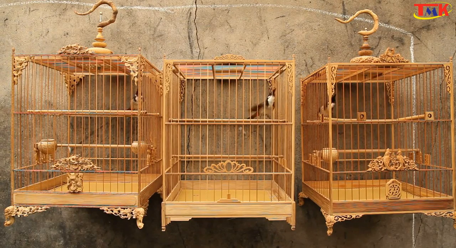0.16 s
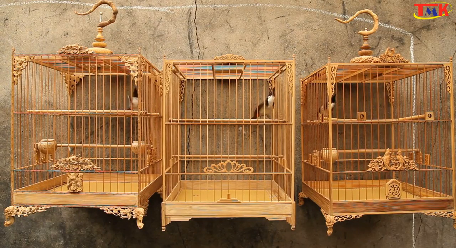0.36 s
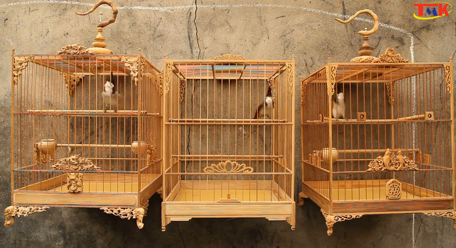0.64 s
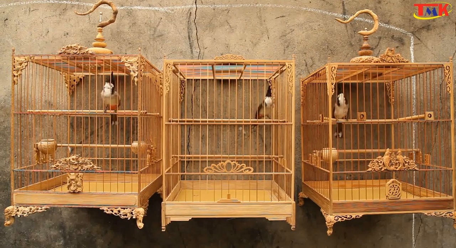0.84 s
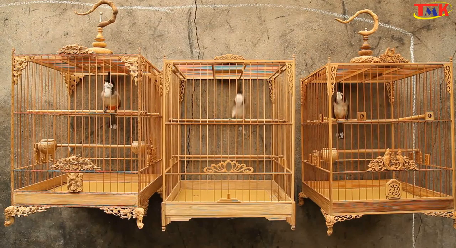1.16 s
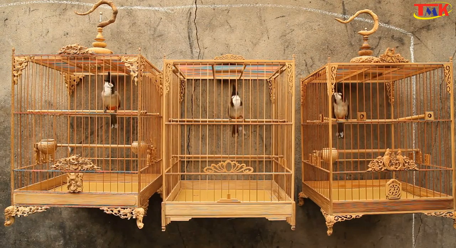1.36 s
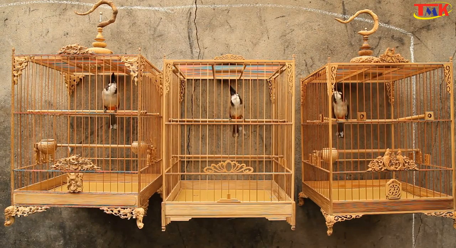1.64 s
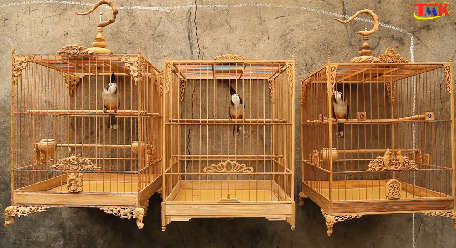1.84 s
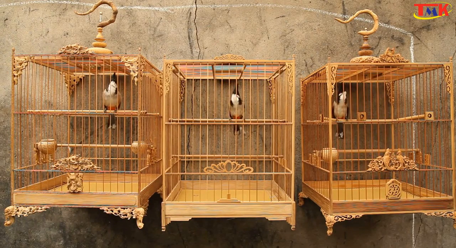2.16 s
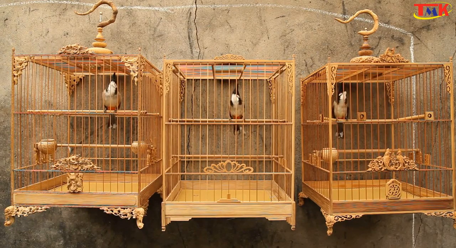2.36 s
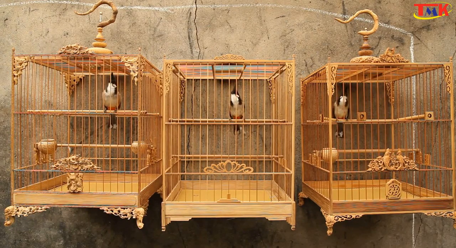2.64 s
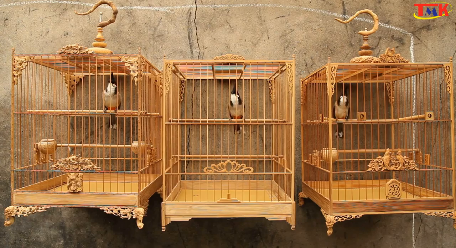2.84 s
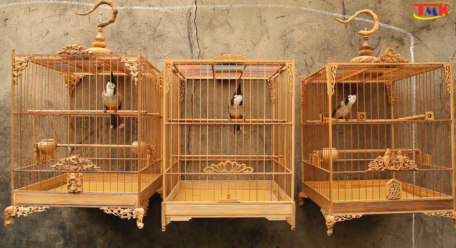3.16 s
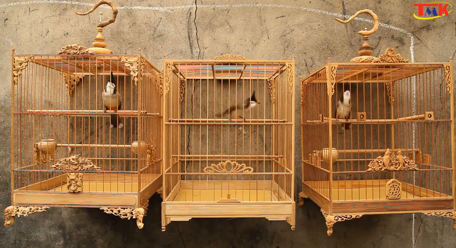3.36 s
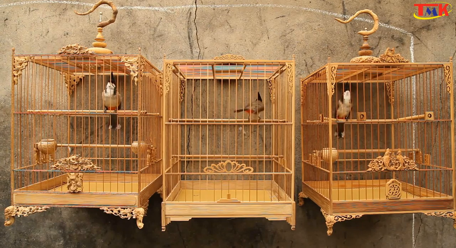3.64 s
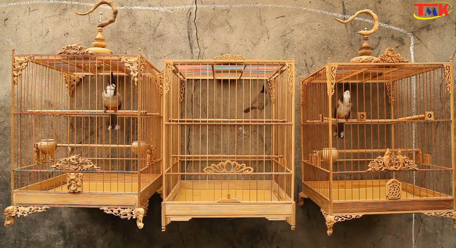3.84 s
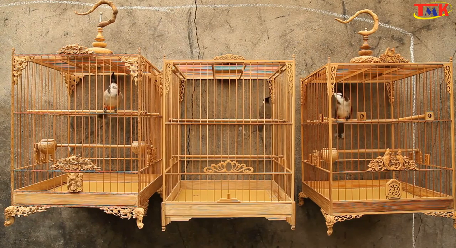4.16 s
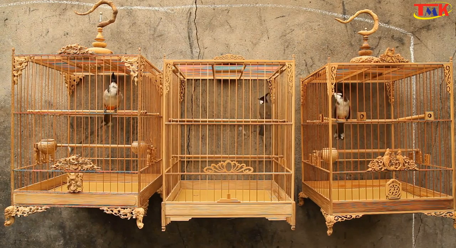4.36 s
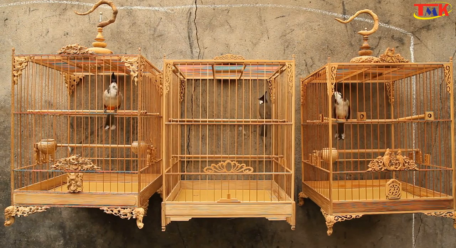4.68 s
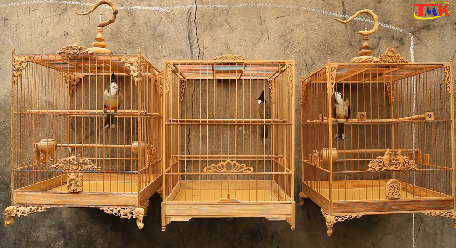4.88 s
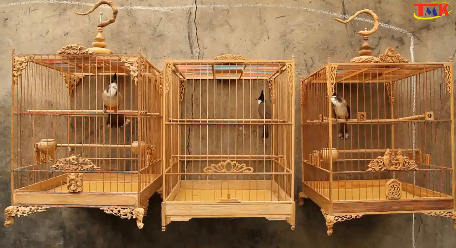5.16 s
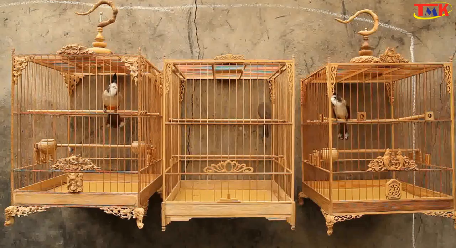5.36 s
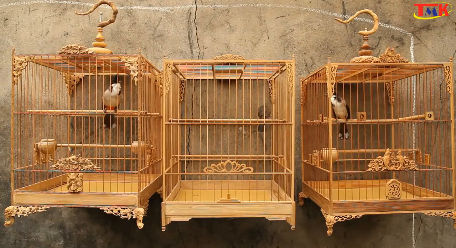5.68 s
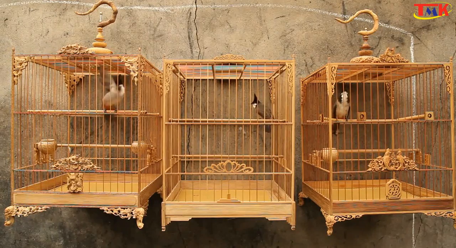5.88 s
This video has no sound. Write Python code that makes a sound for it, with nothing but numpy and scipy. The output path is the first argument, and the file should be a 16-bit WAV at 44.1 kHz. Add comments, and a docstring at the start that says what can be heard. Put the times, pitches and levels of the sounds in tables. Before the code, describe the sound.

Small birds sing short phrases of buzzy chirps and clear whistles with pauses between, over soft hiss and a faint low hum.

```python
"""A hard-walled room: caged bulbuls trade whistles, buzzy chirps and low chuckles in short phrases.
Each call is a syrinx tone with weak overtones; higher notes tend to be louder, purer, more deeply trilled.
Other birds answer from further off and one rustles its feathers, over rumble, hiss and a faint on-off hum.
A gain control ducks at loud chirps and creeps back up in the pauses."""
import sys
import numpy as np
from scipy import signal
from scipy.fft import rfft, irfft, next_fast_len
from scipy.io import wavfile
from scipy.ndimage import uniform_filter1d, map_coordinates

SR = 44100
rng = np.random.default_rng(int(sys.argv[2]) if len(sys.argv) > 2 else 0)


def store_wav(level_fs):
    """Save 16-bit WAV to argv[1]."""
    pcm = np.round(np.clip(np.atleast_2d(level_fs), -1, 1) * 32767)
    wavfile.write(sys.argv[1], SR, pcm.T.astype(np.int16))


N = 265041
TOP_HZ = 15800
ATTACK_S, RELEASE_S = 0.01, 0.0045

# rumble and hiss spectrum: f/Hz, relative density/dB
AIR_SPECTRUM = [(20, -5), (34, -10.5), (65, -12), (100, -7), (130, 0.5), (180, -5.5), (290, -8.5),
                (450, -10.5), (800, -15.5), (2000, -14.5), (4500, -22.5), (7500, -25), (9500, -38),
                (15500, -52)]
# hum swells: t/s, length/s, f/Hz, level/dB
HUM_SWELLS = [(0, 0.11, 147, -38.5), (.33, 0.2, 151, -42), (1.95, 0.65, 128, -52.5), (2.7, 0.2, 142.7, -42),
              (4.25, 1.27, 155.9, -42)]
# throat colour of the overtones: f/Hz, gain/dB
THROAT_GAIN = [(2500, 21), (3300, 4), (4300, -9.5), (5300, -9.5), (6500, -7.5), (8000, -14), (9300, -18.5),
               (10800, -8.5), (12500, -21), (15500, -28)]
# fundamental, weaker at the top of the chirp range: f/Hz, gain/dB
FUNDAMENTAL_GAIN = [(3500, -0.5), (3900, -3), (4400, 1.5)]
# loudness by pitch: f/Hz, gain/dB
EFFORT_GAIN = [(1350, -17.5), (1700, -5.5), (2050, -1.5), (2500, 2), (3100, 4.5), (3700, 6.5)]
# overtones by pitch, ahead of the throat: f/Hz, gain/dB
OVERTONE_GAIN = [(1600, -20), (2100, -22), (2500, -28), (3600, -28.5)]
# full trill by pitch: f/Hz, depth/Hz
TRILL_DEPTH = [(1600, 89), (2400, 162), (3000, 218), (3700, 197)]
# far pips: t/s, length/s, mid f/Hz, accent/dB
FAR_PIPS = [(0, 0.034, 1586, -21.5), (0.137, 0.074, 1649, -17.5), (0.217, 0.078, 1453, -12),
            (5.328, 0.015, 1400, -8), (5.724, 0.03344, 1552, -13.5), (5.89, 0.0364, 1500, -15)]
# far chirps: t/s, length/s, start f/Hz, mid f/Hz, end f/Hz, accent/dB, brightness/dB, swell/dB
FAR_CHIRPS = [ (.245, .064, 1994, 2967, 3250, -21.5, 0, -4), (2.71, 0.1304, 2250, 3330, 3330, -31, -5, 0),
              (2.84, 0.2, 3313, 3265, 3440, -37, -6, -13), (4.823, .091, 3697, 3600, 3457, -42, 6, -11)]
# wing flick: t/s, length/s, level/dB
WING_FLICK = (.268, .05, -29.5)
# feather rustle spectrum: f/Hz, relative density/dB
FEATHER_SPECTRUM = [(1500, -29), (3500, 9), (4800, -1), (7000, -17), (12000, -39)]
# near chirps: t/s, length/s, start f/Hz, mid f/Hz, end f/Hz, accent/dB, brightness/dB, swell/dB
NEAR_CHIRPS = [ (.467, 0.067, 2112, 2883, 2803, -2.5, -1.5, 2.5),
               (.657, .126, 2150, 3110, 3647, -1, -0.5, -6),
               (1.002, 0.046, 2906, 2853, 2568, -2, 1.5, -1.5), (1.25, .058, 1505, 2157, 2489, -1, -1, 1.5),
               (1.383, 0.12, 2750, 3316, 3180, -2.5, -0.5, -9.5),
               (1.515, 0.02645, 2450, 2964, 3042, -1, -1, 5), (1.58, .06, 1586, 2270, 2280, 1, -3, 10),
               (1.729, 0.079, 2398, 2702, 2045, -1.5, -1, -7.5),
               (3.006, 0.12, 1959, 3125, 3500, -2, -3, 2.5), (3.297, 0.053, 1710, 2369, 2620, 2, 1.5, -1.5),
               (3.432, .067, 3060, 3080, 2653, 0, 0, 0.5), (3.497, .052, 3504, 3248, 2893, -0.5, 4.5, 5),
               (3.753, .106, 2785, 3360, 3775, 0, 5, 4), (4.027, 0.11, 2504, 3346, 3798, 2.5, 4, 6),
               (5.465, 0.067, 2288, 3044, 2812, 0, 3, 4), (5.536, 0.065, 2933, 3452, 3833, 2.5, 1.5, -3)]
# near whistles: t/s, length/s, start f/Hz, mid f/Hz, end f/Hz, accent/dB
NEAR_WHISTLES = [ (.64, 0.015, 1530, 1630, 1860, -6), (.745, 0.08, 1648, 2630, 2710, -5.5),
                 (.798, 0.039, 3254, 3170, 3210, 0), (.876, 0.045, 2270, 2695, 2360, -9),
                 (.943, .065, 1555, 2292, 2318, -2), (1.078, 0.068, 1462, 2195, 2033, -2.5),
                 (1.144, .025, 1765, 1600, 2010, -2), (1.361, 0.0253, 2428, 2578, 2560, 1),
                 (1.689, .051, 1446, 1763, 2070, -2), (1.709, 0.02, 2820, 2956, 3090, -7.5),
                 (1.803, 0.0325, 1714, 1740, 1660, -3.5), (3.273, 0.023, 1860, 2033, 2184, -4),
                 (3.4, 0.038, 1942, 2004, 2024, -3), (3.552, .143, 2508, 2296, 1708, -4)]
# one thin far whistle: t/s, length/s, start f/Hz, mid f/Hz, end f/Hz, accent/dB
FAR_WHISTLE = (0.884, 0.33, 4450, 5801, 6447, -38)
# chuckle pitch, two steps up, two arches, a fall: t/s, f/Hz
CHUCKLE_CONTOUR = [(0, 1358), (.018, 1452), (.021, 1655), (.04, 1691), (.047, 2101), (.063, 2247),
                   (.079, 1758), (.09, 2021), (.12, 1657), (.138, 1166)]
# chuckles: t/s, pitch ratio, length ratio, accent/dB
CHUCKLES = [(1.889, 1.0437, 0.91, -1), (3.085, .97, 0.963, -6), (4.586, .99, .94, 0),
            (4.946, 1.011, .96, 1)]
# room decay: f/Hz, T60/s
ROOM_DECAY = [(1000, 0.6), (2000, 0.67), (3500, 0.62), (6000, 0.53), (11000, 0.52), (16000, 0.75)]
# direct sound of the birds, slightly brighter above 3.5 kHz: f/Hz, gain/dB
DIRECT_GAIN = [(3500, -4), (6000, 1), (12000, 1)]
# faint side signal against mid: f/Hz, gain/dB
SIDE_GAIN = [(1000, -14), (1600, -53), (3600, -67), (5000, -29.5), (12000, -21)]


def amp(db):
    return 10 ** (np.asarray(db) / 20)


def unit_rms(x):
    return x / np.sqrt(np.mean(x ** 2) + 1e-20)


def lookup(table, hz):
    """Interpolate on a log frequency axis."""
    knots_hz, values = np.transpose(table)
    return np.interp(np.log(hz + 1), np.log(knots_hz + 1), values)


def wobble(rate_hz, size):
    """Smooth random curve, rate_hz knots a second."""
    knots = rng.standard_normal(int(size * rate_hz / SR) + 4)
    return map_coordinates(knots, [np.arange(size) * rate_hz / SR])


def fade(size, attack_s, release_s):
    """Sine-squared attack and release."""
    t = np.arange(size) / SR
    attack = np.sin(np.pi / 2 * np.clip(t / attack_s, 0, 1))
    release = np.sin(np.pi / 2 * np.clip((t[-1] - t) / release_s, 0, 1))
    return (attack * release) ** 2


def filtered(x, response):
    """Zero-phase filter of gain response(hz)."""
    size = next_fast_len(N + SR // 2)
    return irfft(rfft(x, size) * response(np.fft.rfftfreq(size, 1 / SR)), size)[..., :N]


def coloured(x, table):
    return filtered(x, lambda hz: amp(lookup(table, hz)))


def add(track, start_s, sound):
    part = track[max(round(start_s * SR), 0):][:len(sound)]
    part += sound[:len(part)]


def air():
    """Steady rumble and hiss of the surroundings, rms 1."""
    return unit_rms(coloured(rng.standard_normal(N), AIR_SPECTRUM))


def hum(waver_db=2, drift_hz=3, fade_s=0.07):
    """Low tone that swells, wavers and fades."""
    out = np.zeros(N)
    for start_s, length_s, hz, db in HUM_SWELLS:
        size = int(length_s * SR)
        phase = 2 * np.pi * np.cumsum(hz + drift_hz * wobble(23.7, size)) / SR
        level = fade(size, fade_s, fade_s) * amp(db + waver_db * wobble(4.5, size))
        add(out, start_s, level * np.sin(phase))
    return out


def syrinx(hz, tone_level, overtone_level):
    """Strong fundamental plus harmonics 2-7, coloured by the throat."""
    phase = 2 * np.pi * np.cumsum(hz) / SR
    k = np.arange(2, 8)[:, None]
    overtones = amp(lookup(THROAT_GAIN, k * hz)) * (k * hz < TOP_HZ) * np.sin(k * phase)
    fundamental = amp(lookup(FUNDAMENTAL_GAIN, hz)) * np.sin(phase)
    return tone_level * fundamental + overtone_level * overtones.sum(0)


def syllable(length_s, start_hz, mid_hz, end_hz, accent_db, bright_db=0, swell_db=0, buzz=1,
             trill_rate_hz=160, settle_s=0.019, rasp=0.27, flutter_db=2.5,
             pulse_per_hz=0.00077, hiss_per_hz=0.002):
    """Parabolic glide; a fast, uneven trill of the syrinx makes it buzz, pulse and hiss."""
    size = int(length_s * SR)
    progress = np.linspace(0, 1, size)
    glide_hz = np.polyval(np.polyfit([0, 0.5, 1], [start_hz, mid_hz, end_hz], 2), progress)
    depth_hz = buzz * lookup(TRILL_DEPTH, glide_hz)
    rate_hz = trill_rate_hz * (1 + 0.2066 * wobble(80.86, size))
    trill = np.sin(2 * np.pi * np.cumsum(rate_hz) / SR)
    overshoot = 1 + 0.77 * np.exp(-progress * length_s / settle_s)  # trill starts deeper
    swing_hz = overshoot * depth_hz * (trill + rasp * wobble(904, size))
    hz = glide_hz + swing_hz + 22 * wobble(300.8, size)
    level_db = accent_db + lookup(EFFORT_GAIN, glide_hz) + swell_db * (progress - 0.5)
    level_db += flutter_db * wobble(142, size)
    pulsing = 1 + pulse_per_hz * depth_hz * trill
    level = fade(size, ATTACK_S, RELEASE_S) * amp(level_db) * pulsing
    overtone_level = level * amp(lookup(OVERTONE_GAIN, glide_hz) + bright_db)
    hiss_band = signal.butter(2, [2200, 7000], "bandpass", fs=SR)
    turbulence = unit_rms(signal.lfilter(*hiss_band, rng.standard_normal(size)))
    hiss = hiss_per_hz * depth_hz * overtone_level * turbulence
    return syrinx(hz, level, overtone_level) + hiss


def pips(rise_hz_per_s=4800):
    """Short low notes, all sliding up at one rate."""
    out = np.zeros(N)
    for start_s, length_s, hz, accent_db in FAR_PIPS:
        half_rise_hz = rise_hz_per_s * length_s / 2
        add(out, start_s, syllable(length_s, hz - half_rise_hz, hz, hz + half_rise_hz, accent_db))
    return out


def chirps(notes, buzz=1):
    """Trilled syllables in phrases; buzz is the share of full trill depth."""
    out = np.zeros(N)
    for start_s, *shape in notes:
        add(out, start_s, syllable(*shape, buzz=buzz))
    return out


def wing_flick():
    """Feathers rustle as a bird shifts on its perch."""
    start_s, length_s, db = WING_FLICK
    size = int(length_s * SR)
    rustle = unit_rms(coloured(rng.standard_normal(N), FEATHER_SPECTRUM))
    out = np.zeros(N)
    add(out, start_s, amp(db) * fade(size, ATTACK_S, RELEASE_S) * rustle[:size])
    return out


def whistles(notes):
    """Clear syllables: same voice, shallow trill."""
    return chirps(notes, buzz=0.32)


def chuckles(jitter=0.019, flutter_db=2, pure_db=-35, throaty_db=-21.5, opening_s=0.043):
    """Low warble, varied per call; starts pure, soon turns throaty."""
    out = np.zeros(N)
    knots_s, contour_hz = np.transpose(CHUCKLE_CONTOUR)
    for start_s, pitch_ratio, stretch, accent_db in CHUCKLES:
        size = int(knots_s[-1] * stretch * SR)
        contour_s = np.arange(size) / SR / stretch
        glide_hz = pitch_ratio * np.interp(contour_s, knots_s, contour_hz)
        overtone_db = np.interp(contour_s, [0, opening_s], [pure_db, throaty_db])
        hz = glide_hz * (1 + jitter * wobble(504, size))
        level = amp(accent_db + flutter_db * wobble(201.1, size)) * signal.windows.tukey(size, 0.08)
        voice = syrinx(hz, amp(lookup(EFFORT_GAIN, glide_hz)), amp(overtone_db))
        add(out, start_s, level * voice)
    return out


def echo(x, early_boost=1.34, early_s=0.0327, gap_s=0.0026):
    """Dense reflections off nearby walls, then a tail that decays by frequency."""
    hz, frame_s, spectrum = signal.stft(rng.standard_normal(SR), SR, nperseg=256)
    decay = amp(-60 * frame_s / lookup(ROOM_DECAY, hz)[:, None])
    tail = signal.istft(spectrum * decay, SR, nperseg=256)[1]
    t = np.arange(len(tail)) / SR
    impulse = tail * (1 + early_boost * np.exp(-t / early_s)) * (t > gap_s)
    return signal.fftconvolve(x, impulse / np.linalg.norm(impulse))[:N]


def scene(near_direct_db=-4, near_echo_db=-3, far_direct_db=-11, far_echo_db=-2,
          air_mid_db=-43, air_side_db=-62):
    """Near birds partly direct, far ones mostly echo; almost mono."""
    near = chirps(NEAR_CHIRPS) + whistles(NEAR_WHISTLES) + chuckles()
    far = chirps(FAR_CHIRPS) + whistles([FAR_WHISTLE]) + pips() + wing_flick()
    direct = coloured(amp(near_direct_db) * near + amp(far_direct_db) * far, DIRECT_GAIN)
    room = amp(near_echo_db) * echo(near) + amp(far_echo_db) * echo(far)
    mid = direct + room + amp(air_mid_db) * air() + hum()
    side = coloured(amp(near_echo_db) * echo(near), SIDE_GAIN) + amp(air_side_db) * air()
    return np.array([mid + side, mid - side])


def record(dry, ceiling_db=-12, recovery_db_per_s=9, attack_s=0.002):
    """Gain control: fast duck, slow recovery; then soft clip and low-pass."""
    power = np.abs(uniform_filter1d(dry.mean(0) ** 2, size=130))
    over_db = np.maximum(10 * np.log10(power + 1e-12) - ceiling_db, 0)
    ramp_db = recovery_db_per_s * np.arange(N) / SR
    held_db = np.maximum.accumulate(over_db + ramp_db) - ramp_db  # peak hold, linear fall
    pole = np.exp(-1 / (attack_s * SR))
    duck_db = signal.lfilter([1 - pole], [1, -pole], held_db)
    ducked = dry * amp(-duck_db)
    rounded = ducked / (1 + ducked ** 8) ** (1 / 8)
    return filtered(rounded, lambda hz: hz < TOP_HZ)


dry = scene()
out = record(dry)
store_wav(out)
```